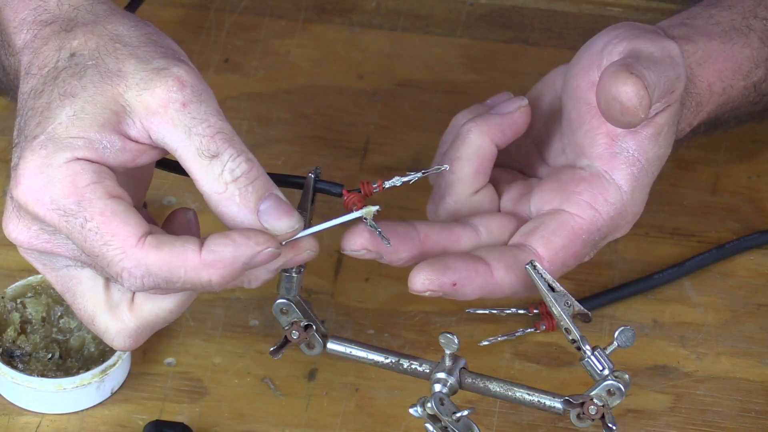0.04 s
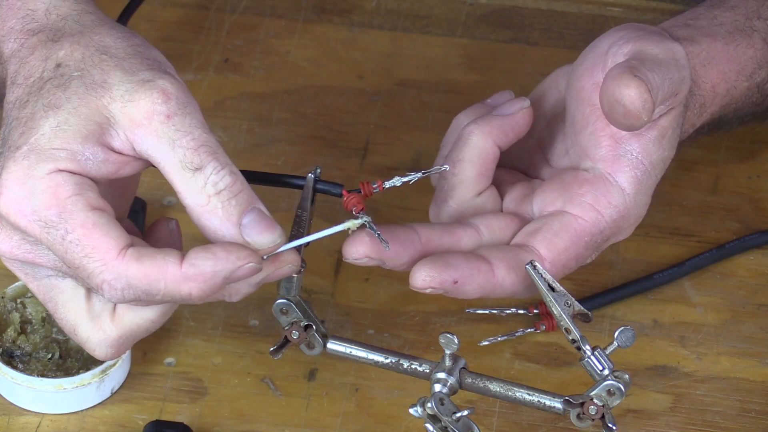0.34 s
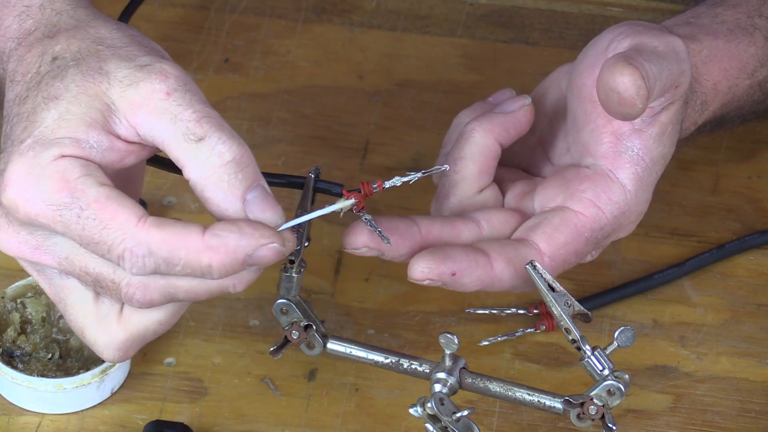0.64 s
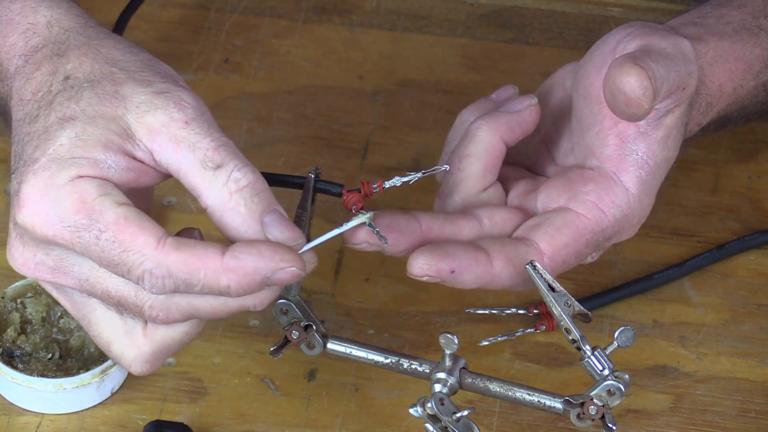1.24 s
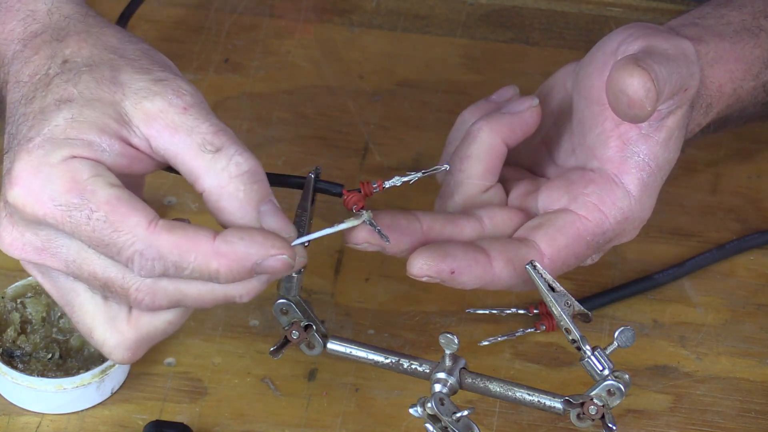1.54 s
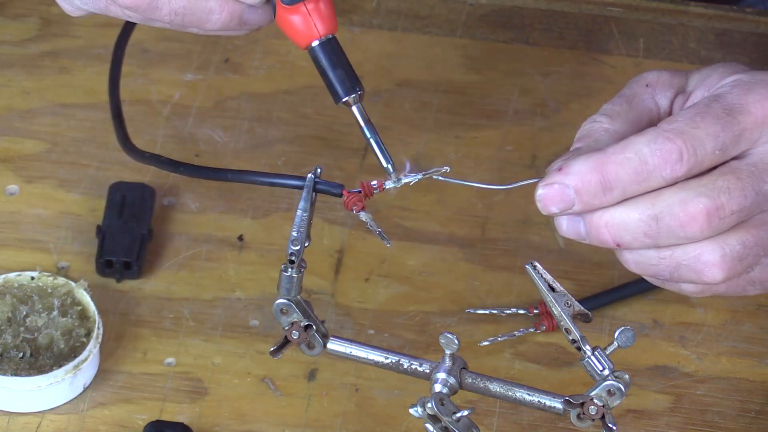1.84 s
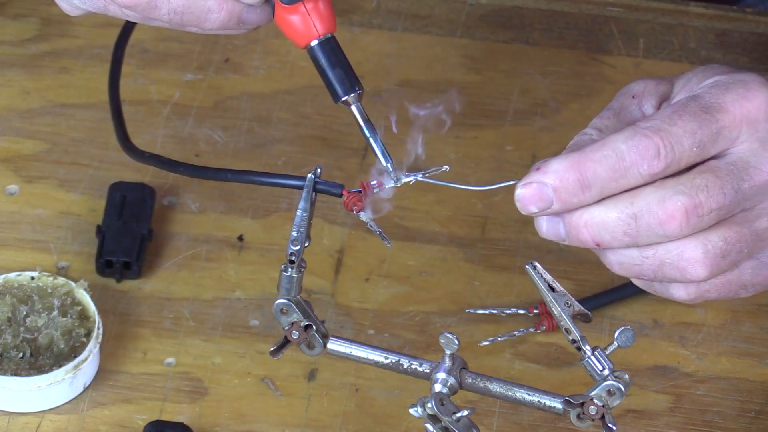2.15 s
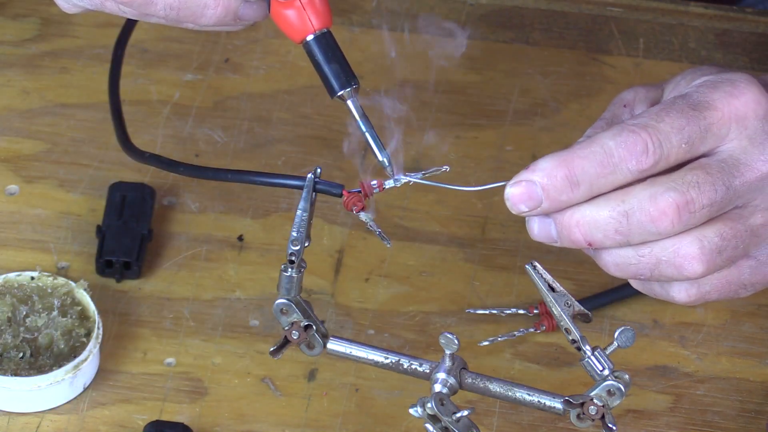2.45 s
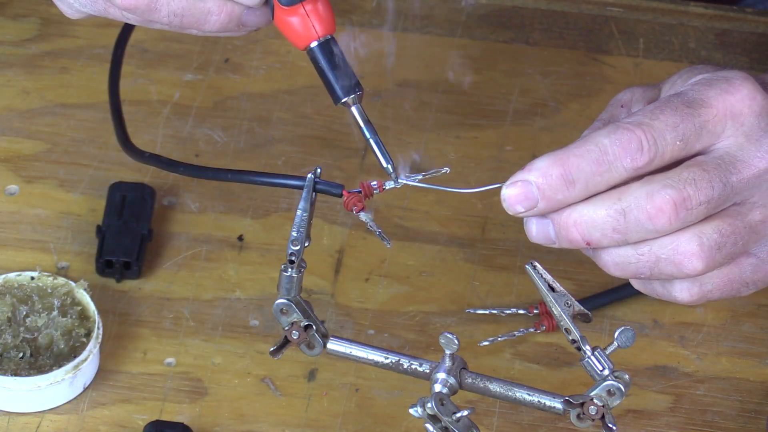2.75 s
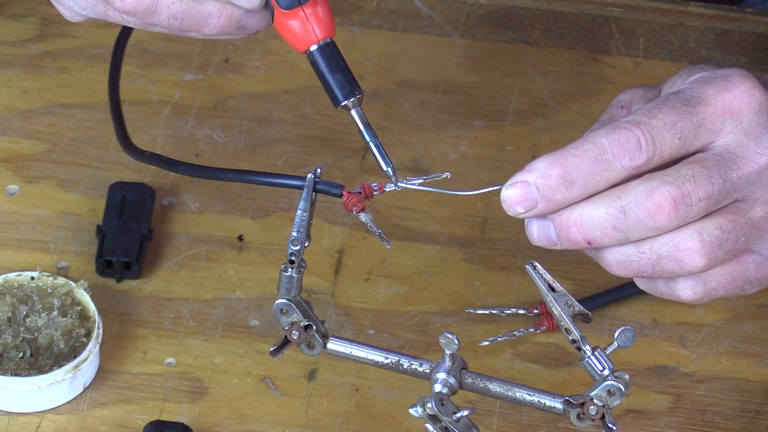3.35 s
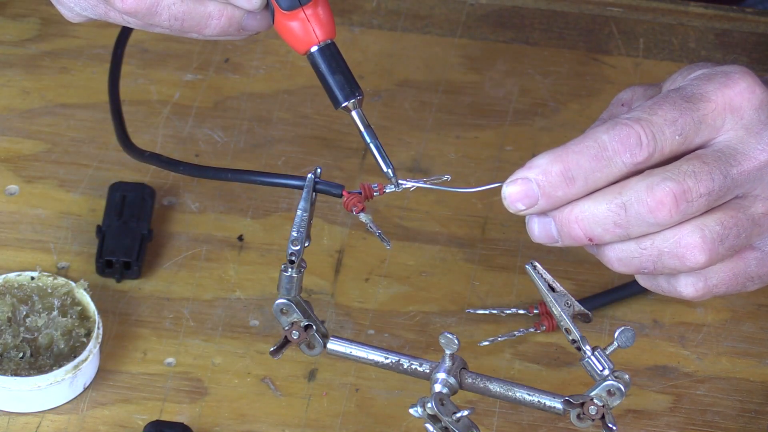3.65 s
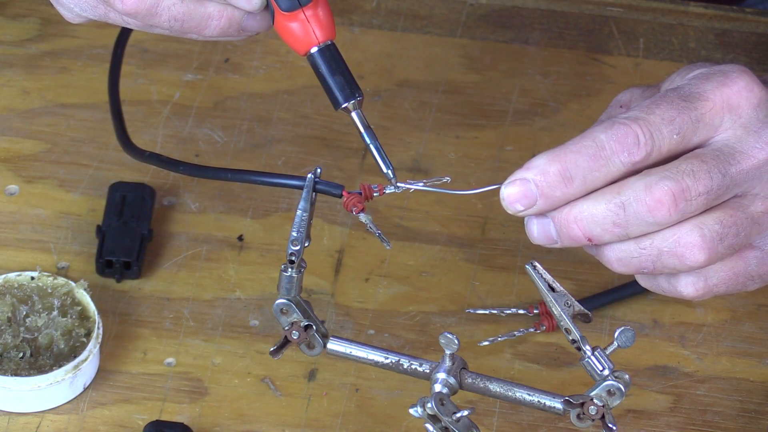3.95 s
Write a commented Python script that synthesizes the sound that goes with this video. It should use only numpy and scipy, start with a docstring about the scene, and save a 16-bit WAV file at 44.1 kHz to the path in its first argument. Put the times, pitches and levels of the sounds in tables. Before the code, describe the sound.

Flux sizzles under a soldering iron, heard close over a steady low electrical hum and room air. Faint hand bumps on the workbench come first. At about 1.7 seconds a dense, popping hiss starts, stopping by 2.5. At 2.7 the iron lands again with a small knock and light scrape, and the sizzle returns, peaking near 3 seconds, then thinning to faint crackle by 4.

```python
"""Soldering at a wooden workbench, microphone close, almost mono, over mains hum and room air.
First come a few soft bumps and thuds of the hands. At 1.7 s the hot iron meets a fluxed wire joint:
boiling flux bursts in tiny pops, a dense hiss, each pop echoed at once by the bench top.
The hiss stops by 2.5 s. At 2.7 s the iron lands again, bumping the clamped wire, and the flux
boils once more, thinning to crackle as it dries."""
import sys
import numpy as np
from scipy import signal
from scipy.fft import rfft, irfft
from scipy.io import wavfile
from scipy.ndimage import uniform_filter1d

SR = 44100
rng = np.random.default_rng(int(sys.argv[2]) if len(sys.argv) > 2 else 0)


def dump(signal):
    """Clip the signal to [-1, 1] and save it as 16-bit WAV at the path in sys.argv[1]."""
    limited = np.clip(np.atleast_2d(signal).T, -1, 1)
    pcm = np.round(limited * 32767).astype(np.int16)
    wavfile.write(sys.argv[1], SR, pcm)


N = 176400
T = np.arange(N) / SR

# boiling flux at each touch of the iron: t/s, level/dB
FIRST_BOIL = [(1.665, -70), (1.705, -46), (1.765, -52), (1.79, -44), (1.83, -50), (1.872, -54),
              (1.889, -46), (1.95, -39.5), (1.99, -38), (2.06, -42), (2.2, -42.5), (2.342, -45.5),
              (2.352, -35), (2.378, -36.5), (2.407, -43), (2.424, -57), (2.48, -76)]
SECOND_BOIL = [(2.66, -76), (2.675, -51), (2.74, -43), (2.79, -45), (2.9, -40.5), (2.945, -40.5),
               (2.975, -35.5), (3.0, -40.5), (3.06, -40.5), (3.11, -41), (3.16, -41.5), (3.24, -45.5),
               (3.35, -50), (3.56, -51), (3.65, -54.5), (3.73, -51.5), (3.82, -58), (4.0, -60.5)]
# how thickly the bubbles burst: t/s, rate/(pops per s)
POP_RATE = [(1.7, 4800), (2.0, 7100), (2.28, 3100), (2.36, 8600), (2.45, 1800), (2.7, 2800), (2.97, 5200),
            (3.05, 2030), (3.3, 800), (3.6, 400), (3.95, 140)]
# colour of a pop for each position of the iron: f/Hz, level/dB
FIRST_COLOUR = [(200, -21), (900, -3.5), (1500, -9), (2200, -4), (3500, -2), (4400, -2), (5200, -1.5),
                (5800, -0.5), (6600, 1), (7200, -3), (7700, 2), (8300, -5), (9700, 5), (10300, -5.5),
                (11300, 5.5), (12100, 1), (13000, -4), (13700, 8), (14500, -4), (15600, 0.5)]
SECOND_COLOUR = [(200, -18), (900, -7.5), (1500, -8.5), (2200, -3.5), (3500, -2), (4600, -1), (5250, -2.5),
                 (5800, -1.5), (6800, 1.5), (7200, -5.5), (7950, 2), (8500, -14), (9000, 5.5), (9600, -5),
                 (10900, 4), (12000, 6), (12650, -3), (13100, -4), (13900, 3), (14600, -4), (15600, -2.5)]
# echoes of a pop from the bench and the hand: delay/ms, share of the direct sound
NEAR_ECHOES = [(0.483, 0.33), (0.782, 0.075)]
# larger single pops: t/s, relative level/dB
SPITS = [(1.8624, -34), (2.4374, -38), (2.4578, -41), (2.828, -29), (3.0134, -25), (3.0244, -25),
         (3.0344, -23), (3.252, -28), (3.3613, -32), (3.4116, -32), (3.4615, -34), (3.5209, -34),
         (3.5478, -32), (3.5564, -35), (3.5753, -34), (3.6865, -35), (3.7124, -33), (3.7214, -35),
         (3.7374, -37), (3.7848, -38), (3.8432, -37), (3.8826, -37), (3.9165, -38), (3.937, -38),
         (3.9424, -45)]
# tip and solder scraping over the strands: t/s, length/s, level/dB
SCRAPES = [(1.7, .12, -58), (1.929, 0.092, -54.5), (2.664, 0.016, -50), (2.704, 0.011, -57),
           (2.732, 0.019, -45), (2.917, 0.012, -50.5), (2.959, .03, -45)]
# colour of a scrape: f/Hz, level/dB
SCRAPE_COLOUR = [(200, -18), (600, -10), (950, 3), (1300, -8), (1750, 4.5), (3500, 2), (6000, -8),
                 (15000, -21)]
# bumps on the wire and its clamp stand: t/s, length/s, level/dB, tilt/(dB per octave)
BUMPS = [(.36, .04, -49.5, 3.5), (1.62, .02, -55, -4), (1.87, .2, -56.5, -6), (2.668, .017, -41, -6),
         (2.692, .05, -54.5, -6)]
# modes of the wire and stand: f/Hz, width/Hz, level/dB
STAND_MODES = [(285, 45, -1), (362, 45, 0), (1100, 55, -4), (1195, 55, -5), (1490, 60, -15)]
# hands on the bench: t/s, level/dB
THUDS = [(.48, -60), (.605, -61), (1.26, -66), (1.82, -57), (2.58, -58), (3.35, -56.5)]
# mains harmonics: multiple of the mains, early level/dB, late level/dB
HUM_HARMONICS = [(3, -72, -73), (4, -52, -51), (5, -73, -69), (6, -69, -66), (8, -59, -59), (10, -68, -70),
                 (11, -72, -80), (13, -76, -72), (14, -67, -67), (15, -77, -73), (16, -68, -71),
                 (17, -65, -67), (19, -68, -69), (22, -62, -74), (23, -89, -74), (25, -66, -72),
                 (30, -76, -74), (31, -75, -79), (32, -78, -75), (34, -76, -75), (36, -74, -73),
                 (38, -77, -70), (40, -74, -71), (42, -78, -71), (43, -75, -76)]
# colour of the room air, early and late: f/Hz, level/dB
EARLY_AIR = [(20, 15), (45, -41), (70, -12), (130, -0.5), (350, -3.5), (600, -5), (1000, -7), (1700, -10.5),
             (2500, -13), (3300, -14.5), (5000, -17), (9500, -18), (15500, -24.5)]
LATE_AIR = [(20, -15), (45, -17), (70, -5), (130, -0.5), (350, -2.5), (600, -7), (1000, -8.5), (1700, -11),
            (2500, -12), (3300, -16), (5000, -18), (9500, -18), (15500, -22.5)]
# colour of the noise that differs between the two microphones: f/Hz, level/dB
SIDE_AIR = [(25, -10), (70, -5), (200, -12), (500, 2), (1100, -22), (2500, -18), (5000, -6), (15500, -12)]

SIZE_SPREAD_DB, SIZE_LIMIT = 4.5, 2.2  # pop sizes span at most 2.2 spreads
STEAM_DB, SURGE_DB, SURGE_HZ = -11, 1.1, 30
FLARE_S, FLARE_WIDTH_S, FLARE_DB = 2.137, .006, 7  # a pocket of flux flashes off
SPIT_GAIN_DB, SPIT_DECAY_S = 7.5, .0005
CHANGE_S, CHANGE_LENGTH_S = 1.83, .19  # the background changes colour here
ROOM_DB, ROOM_SIDE_DB, AIR_SIDE_DB, HUM_SIDE_DB = -16, -33.5, -71, -49


def boiling_flux(boil, colour):
    """One touch of the iron: bubbles of many sizes burst at random over a little steam."""
    times, db = np.transpose(boil)
    start, end = times[0], times[-1]
    chance = np.interp(T, *np.transpose(POP_RATE)) / SR
    sizes = amp(SIZE_SPREAD_DB * np.minimum(rng.exponential(1, N), SIZE_LIMIT))
    pops = unit(sizes) * (rng.random(N) < chance) / np.sqrt(chance)
    pops -= uniform_filter1d(pops, size=201)  # no steady pressure
    flare_db = FLARE_DB * np.exp(-((T - FLARE_S) / FLARE_WIDTH_S) ** 2)
    level_db = np.interp(T, times, db) + flare_db + SURGE_DB * drift(SURGE_HZ)
    steam = amp(STEAM_DB) * rng.standard_normal(N)
    boiling = (pops + steam) * amp(level_db) * (T > start) * (T < end)
    return through(boiling + spits(start, end), bubble_pop(colour))


def bubble_pop(colour):
    """One bubble bursts; echoes off bench and hand reach the microphone within a millisecond."""
    click = impulse(colour)
    hz = np.fft.rfftfreq(len(click), 1 / SR)
    echoes = sum(share * np.exp(-2j * np.pi * hz * ms / 1000) for ms, share in NEAR_ECHOES)
    return -unit_energy(irfft(rfft(click) * (1 + echoes)))


def spits(start, end):
    """The larger pops of one touch, each a fast-dying spray of noise."""
    out, t = np.zeros(N), T[:SR // 200]
    for s, db in SPITS:
        if start < s < end:
            spray = rng.standard_normal(len(t)) * np.exp(-t / SPIT_DECAY_S)
            add(out, s, amp(db + SPIT_GAIN_DB) * unit_energy(spray))
    return out


def tip_scrapes():
    """Tip and solder rub over the strands in short puffs of noise."""
    friction = np.zeros(N)
    for s, length, db in SCRAPES:
        add(friction, s, amp(db) * unit(puff(length)))
    return through(friction, impulse(SCRAPE_COLOUR))


def stand_bumps(low_cut_hz=186):
    """Wire and stand ring briefly when bumped; the small stand radiates no bass."""
    out, t = np.zeros(N), T[:SR // 5]
    for s, length, db, tilt_db in BUMPS:
        ring = np.zeros(len(t))
        for hz, width, mode_db in STAND_MODES:
            gain = amp(mode_db + tilt_db * np.log2(hz))
            ring += gain * np.exp(-np.pi * width * t) * np.sin(2 * np.pi * hz * t)
        bump = signal.fftconvolve(puff(length), low_cut(ring, low_cut_hz, order=2))
        add(out, s, amp(db) * np.sqrt(length * SR) * unit_energy(bump))
    return out


def bench_thuds(hz=78, rise_s=.011):
    """Hands land softly on the bench, which gives a low, damped note."""
    out, t = np.zeros(N), T[:SR // 5]
    thud = t / rise_s * np.exp(1 - t / rise_s) * np.sin(2 * np.pi * hz * t)
    for s, db in THUDS:
        add(out, s, amp(db) * thud)
    return out


def workshop_tail(x, t60_s=.17):
    """The workshop returns a short tail of sparse reflections."""
    t = T[:SR // 2]
    reflections = rng.standard_normal(len(t)) * (rng.random(len(t)) < .15) * (t > .001)
    return through(x, unit_energy(reflections * amp(-60 * t / t60_s)))


def mains_hum(late, mains_hz=60.02, waver_db=.72):
    """Mains harmonics behind the work, each wavering slightly on its own."""
    out = np.zeros(N)
    for multiple, early_db, late_db in HUM_HARMONICS:
        level_db = early_db + (late_db - early_db) * late + waver_db * drift(rate_hz=2.8)
        cycles = multiple * mains_hz * T + rng.random()
        out += np.sqrt(2) * amp(level_db) * np.sin(2 * np.pi * cycles)
    return out


def room_air(late, early_db=-54.5, late_db=-55.5):
    """Room tone, blending from its early to its late colour as late goes from 0 to 1."""
    early_air = amp(early_db) * np.sqrt(1 - late) * noise(EARLY_AIR)
    return early_air + amp(late_db) * np.sqrt(late) * noise(LATE_AIR)


def amp(db):
    """Decibels to gain."""
    return 10 ** (np.asarray(db) / 20)


def unit(x):
    """Scales to an rms of one."""
    return x / np.sqrt(np.mean(x ** 2) + 1e-20)


def unit_energy(x):
    """Scales to an energy of one."""
    return x / np.linalg.norm(x)


def add(mix, s, sound):
    """Mixes a sound in at s seconds."""
    part = mix[max(round(s * SR), 0):][:len(sound)]
    part += sound[:len(part)]


def impulse(colour, size=4096):
    """Minimum-phase click of unit energy with the given colour."""
    hz, db = np.transpose(colour)
    bin_hz = abs(np.fft.fftfreq(size, 1 / SR))
    log_gain = np.log(amp(np.interp(np.log(bin_hz + 1), np.log(hz), db)))
    spectrum = np.exp(np.conj(signal.hilbert(log_gain)))
    return unit_energy(np.fft.ifft(spectrum).real[:size // 2])


def through(x, response):
    """Passes a sound through an impulse response."""
    return signal.fftconvolve(x, response)[:len(x)]


def low_cut(x, hz, order):
    """Rolls off the bass below hz."""
    return signal.lfilter(*signal.butter(order, hz, "highpass", fs=SR), x)


def noise(colour):
    """Steady coloured noise of unit rms."""
    return unit(through(rng.standard_normal(N), impulse(colour)))


def drift(rate_hz):
    """Slow random wandering of unit rms."""
    rolloff = 1 + (np.fft.rfftfreq(N, 1 / SR) / rate_hz) ** 4
    return unit(irfft(rfft(rng.standard_normal(N)) / rolloff, N))


def puff(length):
    """A short arch of white noise."""
    arch = np.sqrt(np.maximum(np.sin(np.pi * T / length), 0))
    return (rng.standard_normal(N) * arch)[:int(length * SR)]


def scene():
    """The joint sits close and centred between the microphones, with a trace of diffuse width."""
    late = np.clip(.5 + (T - CHANGE_S) / CHANGE_LENGTH_S, 0, 1)
    flux = boiling_flux(FIRST_BOIL, FIRST_COLOUR) + boiling_flux(SECOND_BOIL, SECOND_COLOUR)
    near = flux + tip_scrapes() + stand_bumps() + bench_thuds()
    hum = mains_hum(late)
    mid = near + amp(ROOM_DB) * workshop_tail(near) + room_air(late) + hum
    side = amp(ROOM_SIDE_DB) * workshop_tail(near)
    side += amp(AIR_SIDE_DB) * noise(SIDE_AIR) - amp(HUM_SIDE_DB) * hum
    return np.array([mid + side, mid - side])


def record(dry):
    """The recorder's low cut and band limit."""
    band_limit = signal.firwin(1023, cutoff=15780, window=("kaiser", 9), fs=SR)
    return signal.oaconvolve(low_cut(dry, hz=38, order=3), band_limit[None], "same")


dry = scene()
out = record(dry)
dump(out)
```